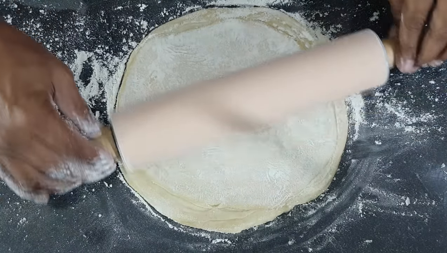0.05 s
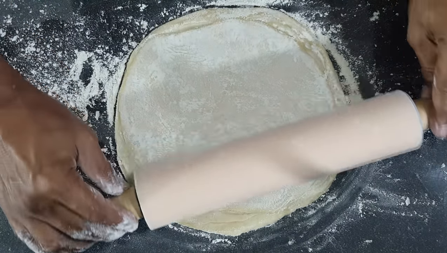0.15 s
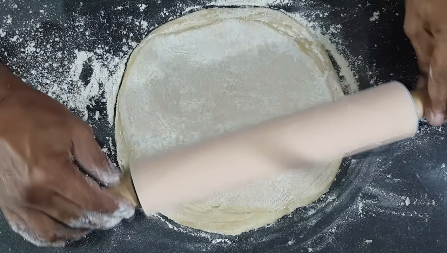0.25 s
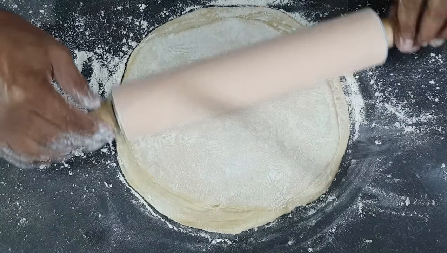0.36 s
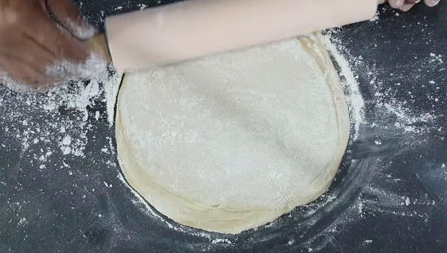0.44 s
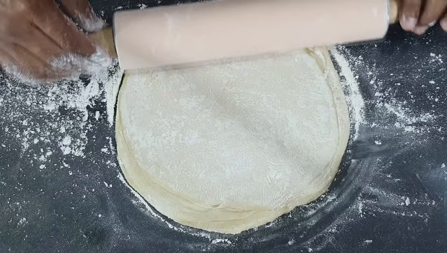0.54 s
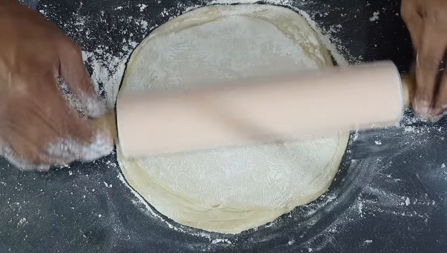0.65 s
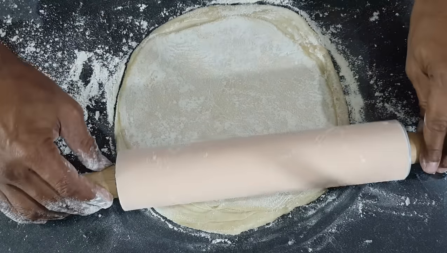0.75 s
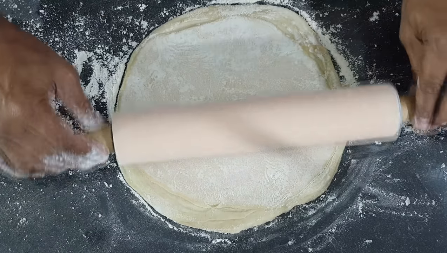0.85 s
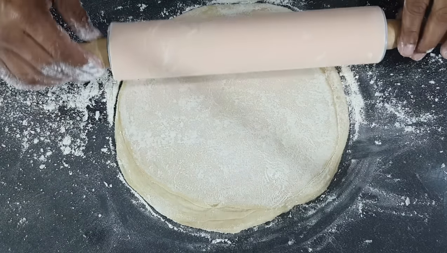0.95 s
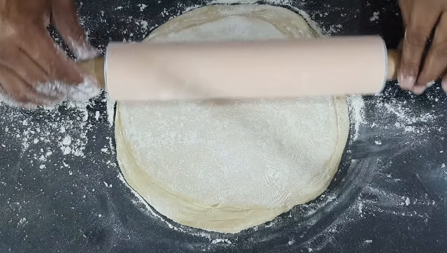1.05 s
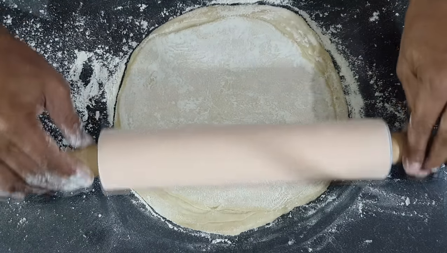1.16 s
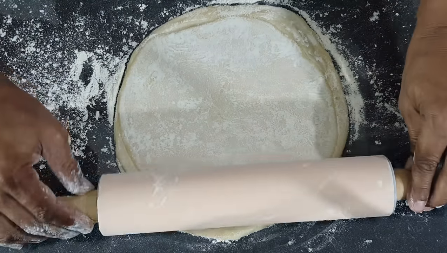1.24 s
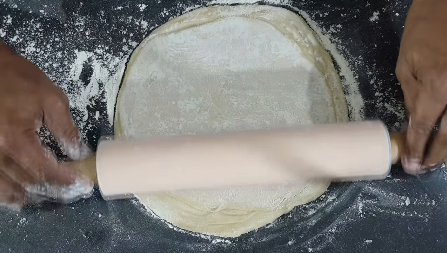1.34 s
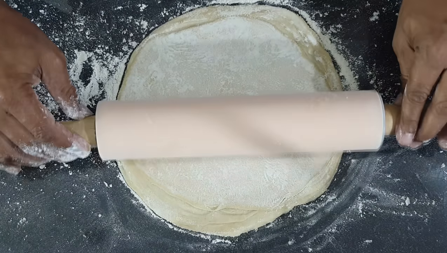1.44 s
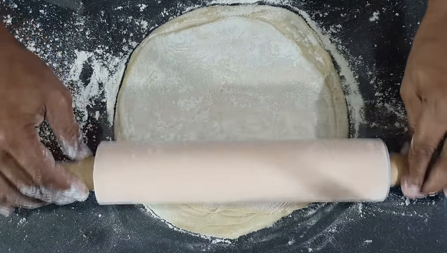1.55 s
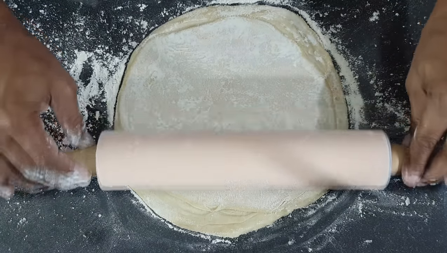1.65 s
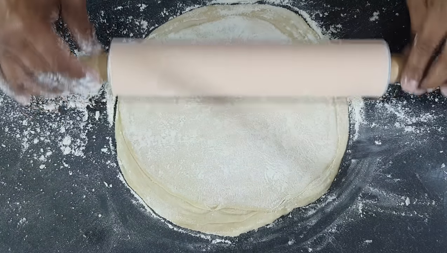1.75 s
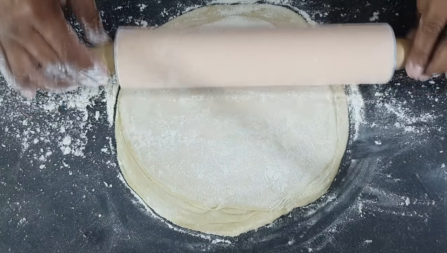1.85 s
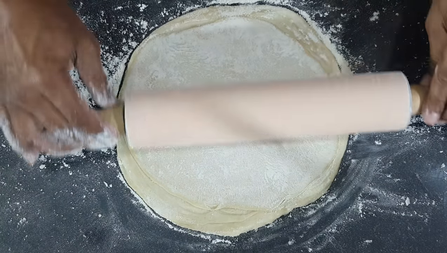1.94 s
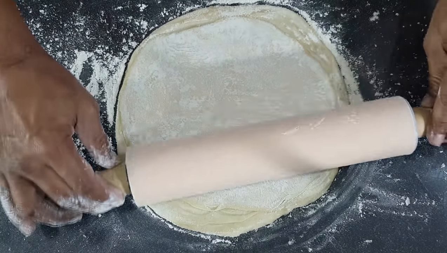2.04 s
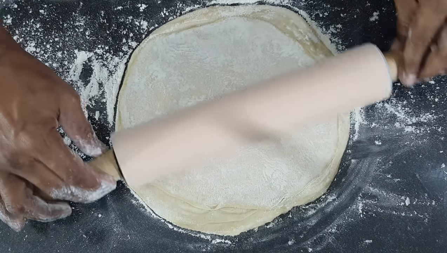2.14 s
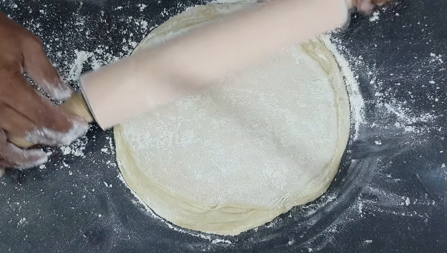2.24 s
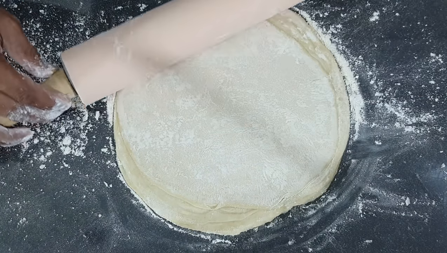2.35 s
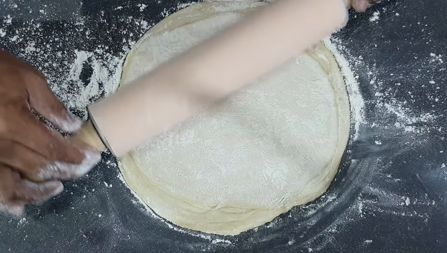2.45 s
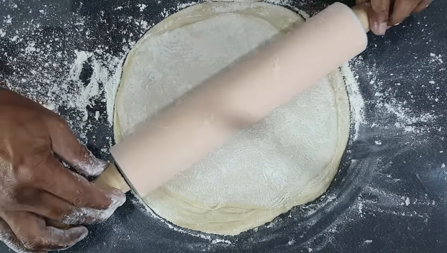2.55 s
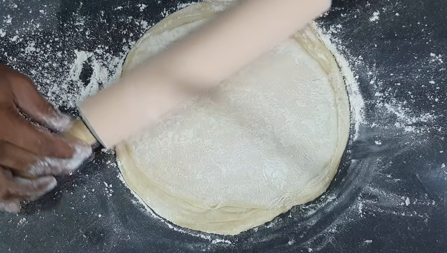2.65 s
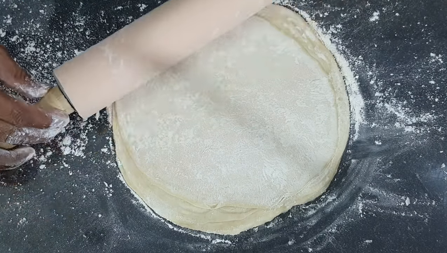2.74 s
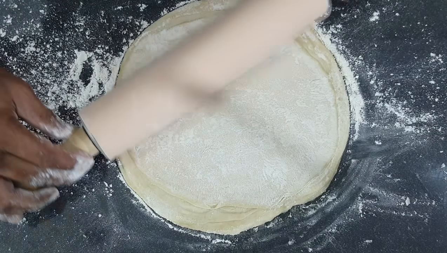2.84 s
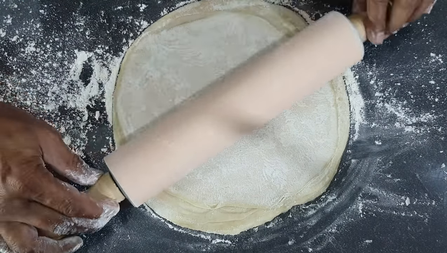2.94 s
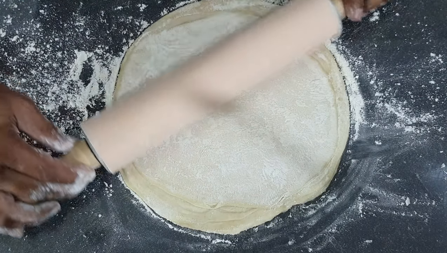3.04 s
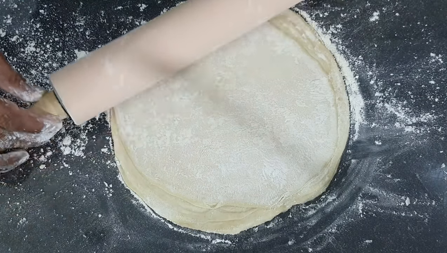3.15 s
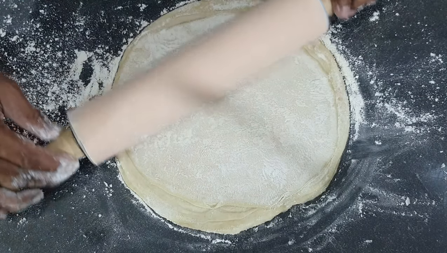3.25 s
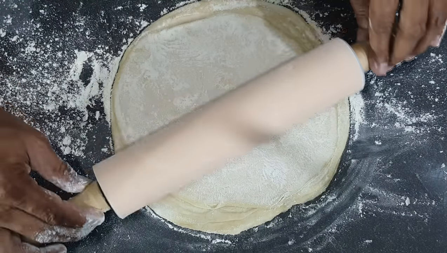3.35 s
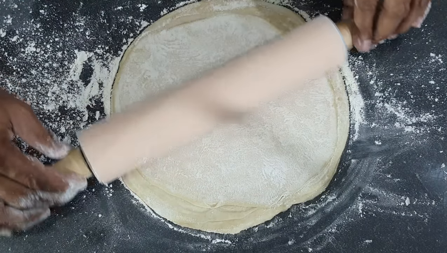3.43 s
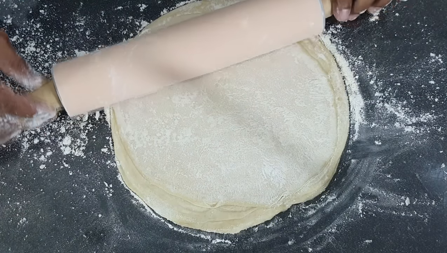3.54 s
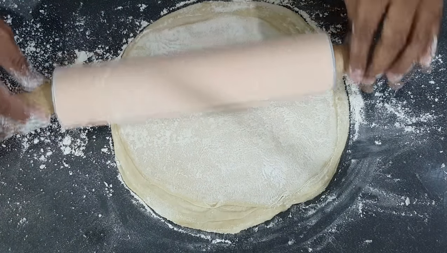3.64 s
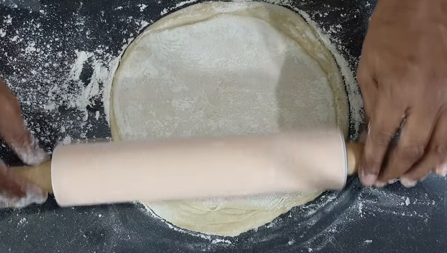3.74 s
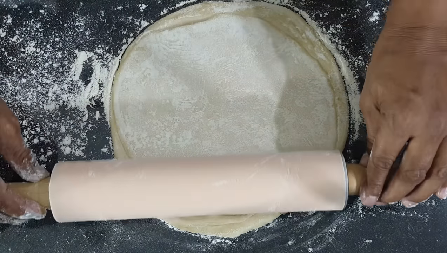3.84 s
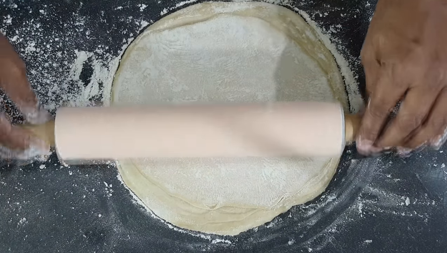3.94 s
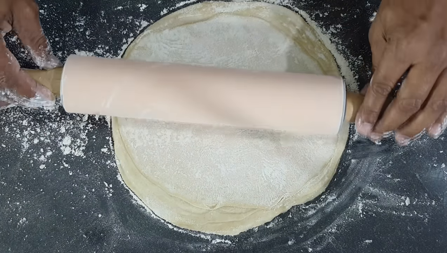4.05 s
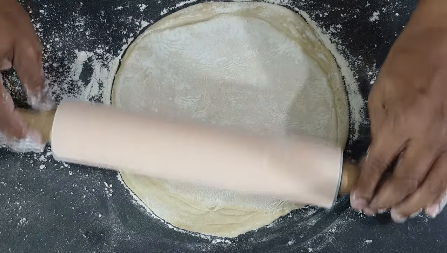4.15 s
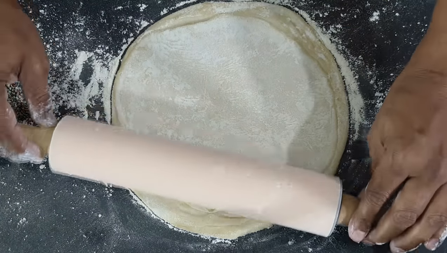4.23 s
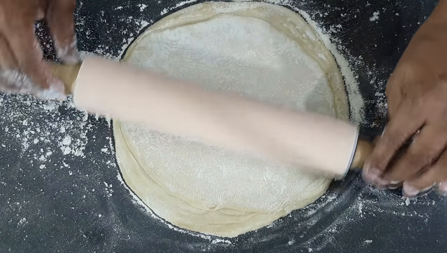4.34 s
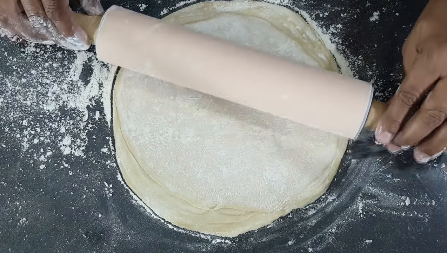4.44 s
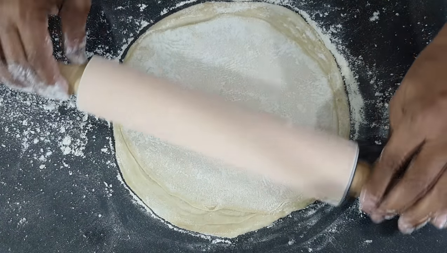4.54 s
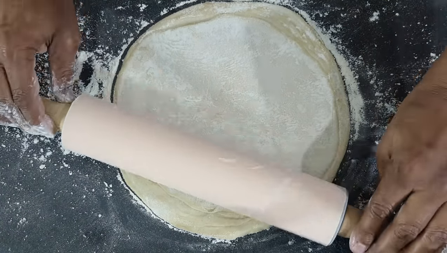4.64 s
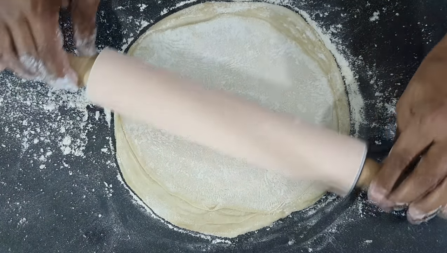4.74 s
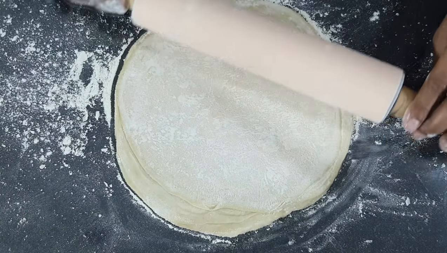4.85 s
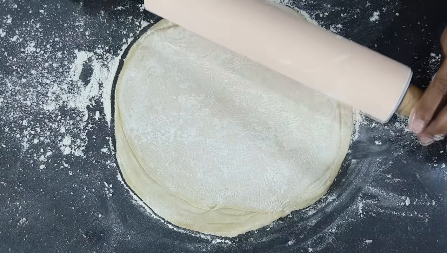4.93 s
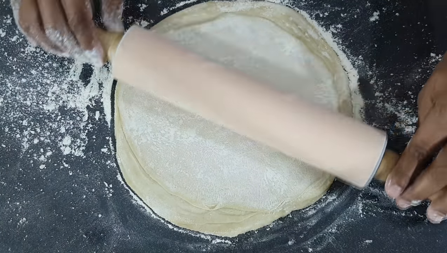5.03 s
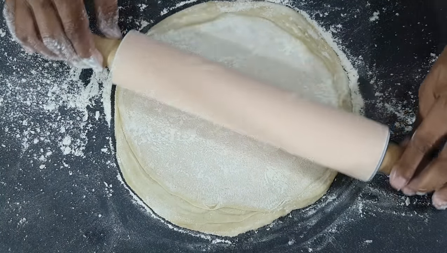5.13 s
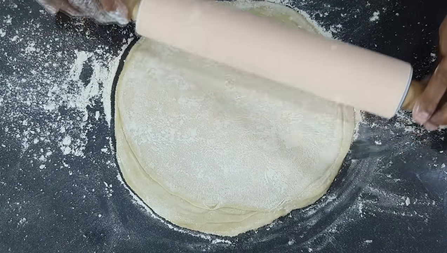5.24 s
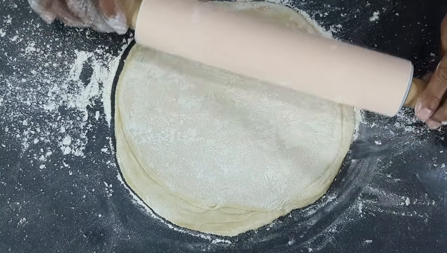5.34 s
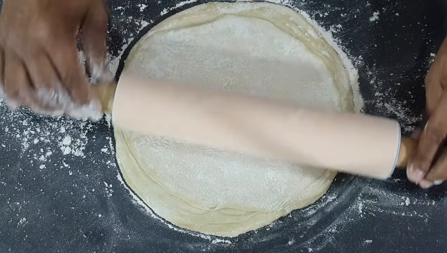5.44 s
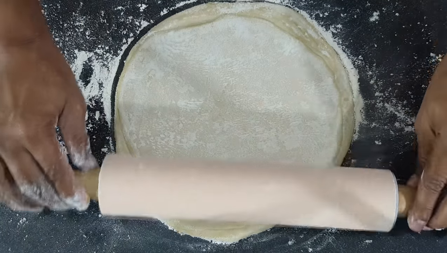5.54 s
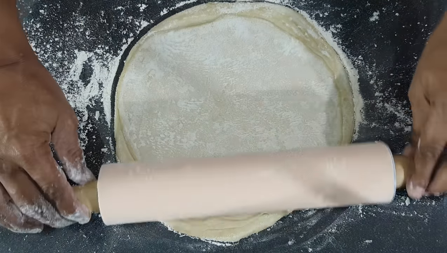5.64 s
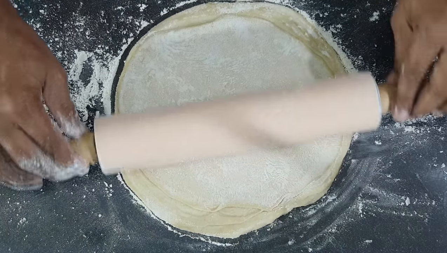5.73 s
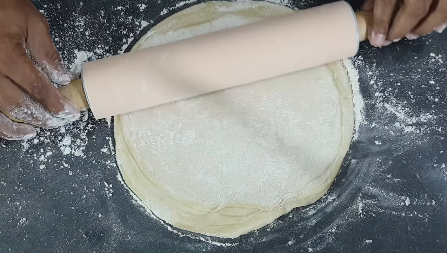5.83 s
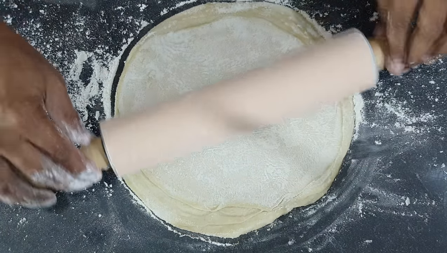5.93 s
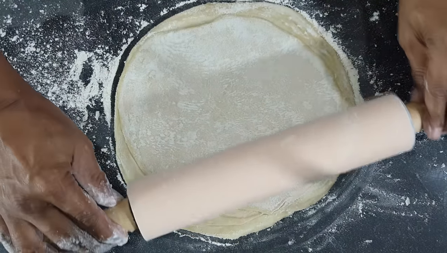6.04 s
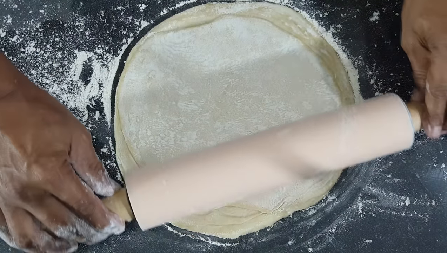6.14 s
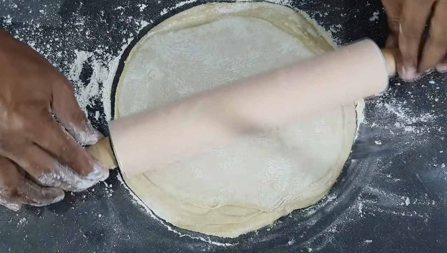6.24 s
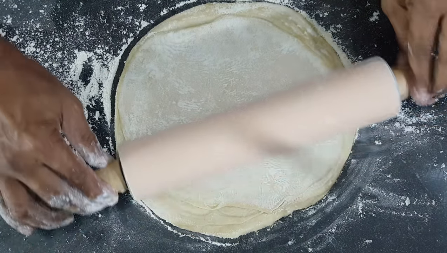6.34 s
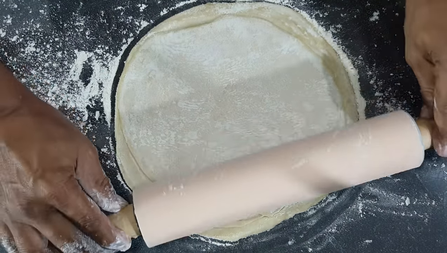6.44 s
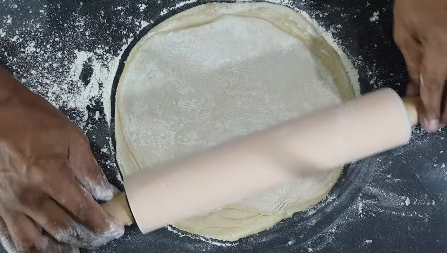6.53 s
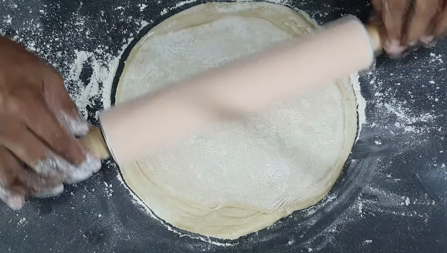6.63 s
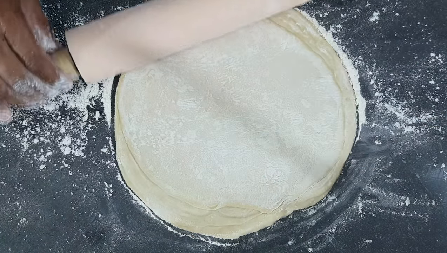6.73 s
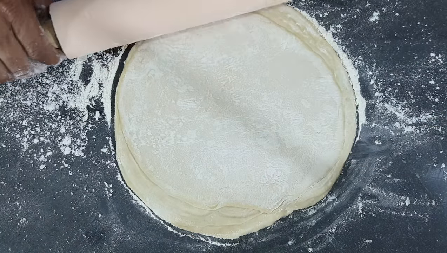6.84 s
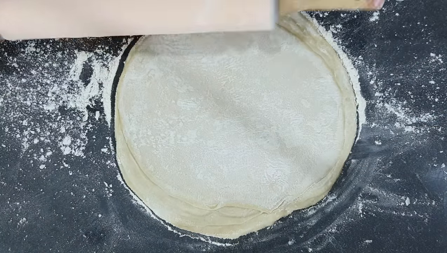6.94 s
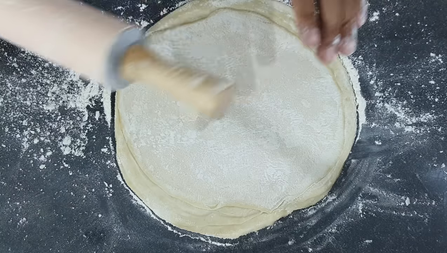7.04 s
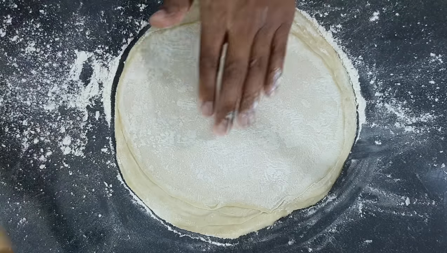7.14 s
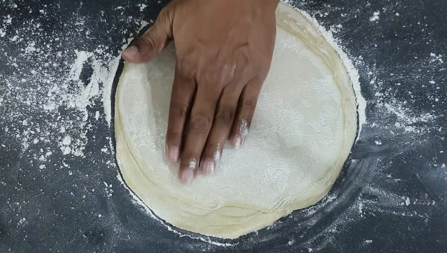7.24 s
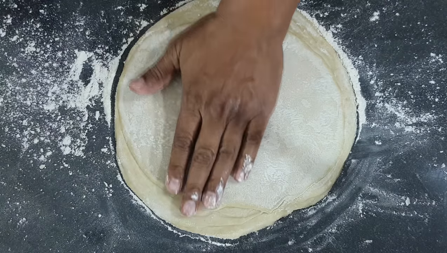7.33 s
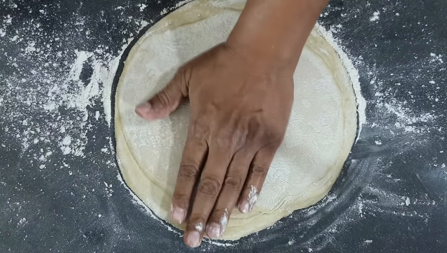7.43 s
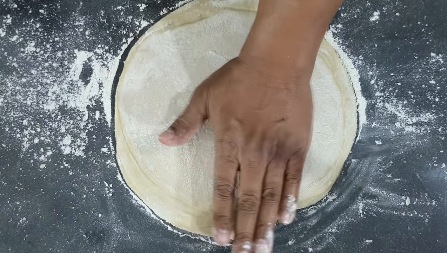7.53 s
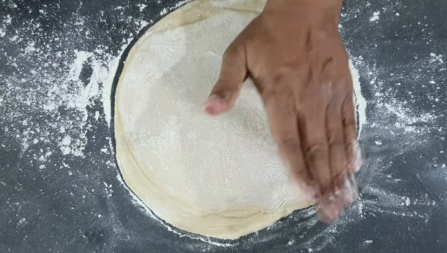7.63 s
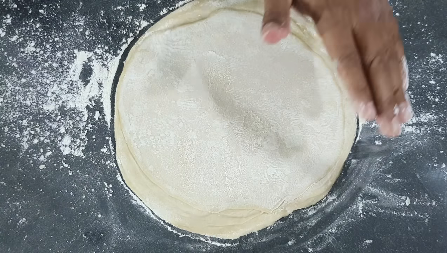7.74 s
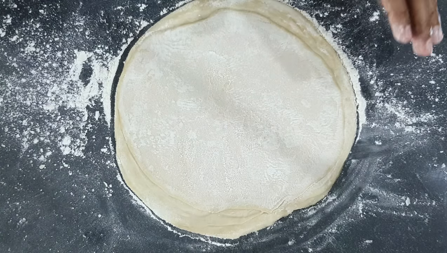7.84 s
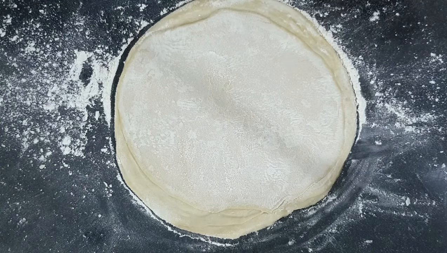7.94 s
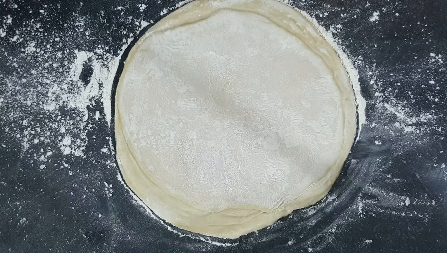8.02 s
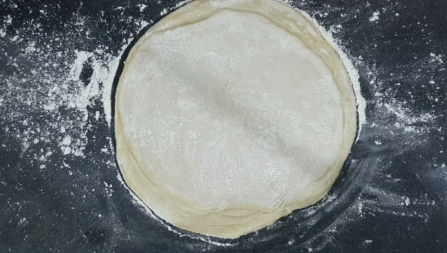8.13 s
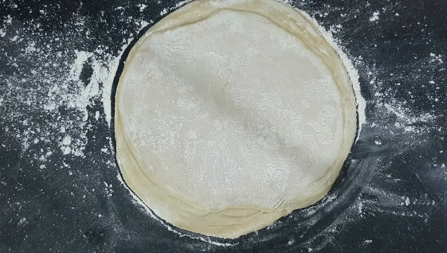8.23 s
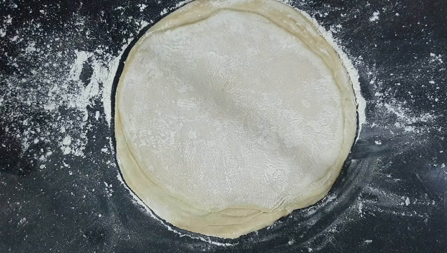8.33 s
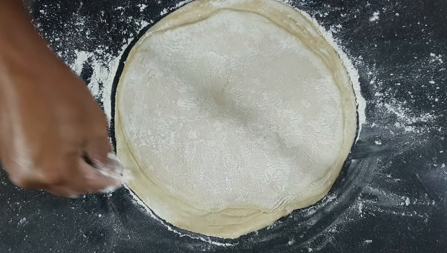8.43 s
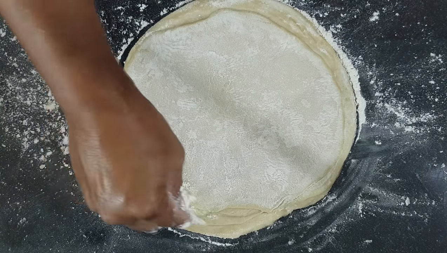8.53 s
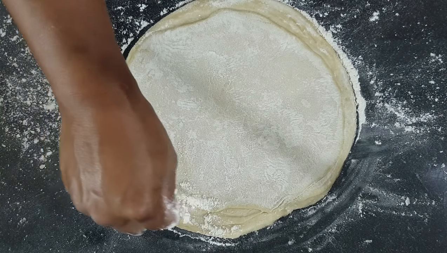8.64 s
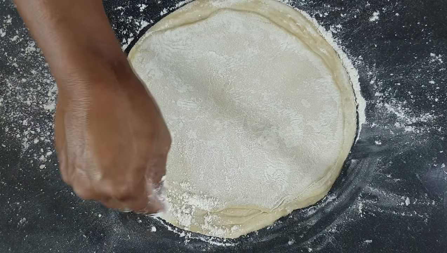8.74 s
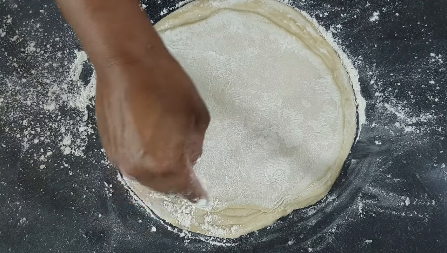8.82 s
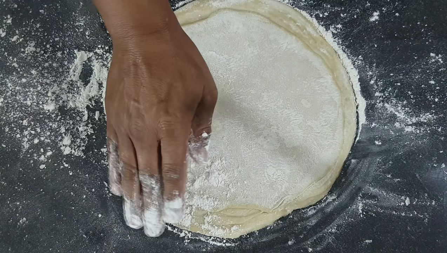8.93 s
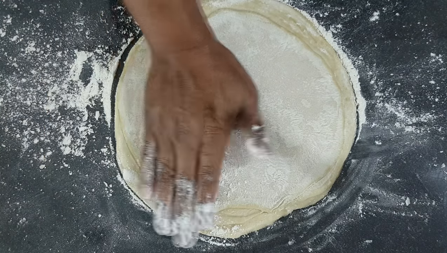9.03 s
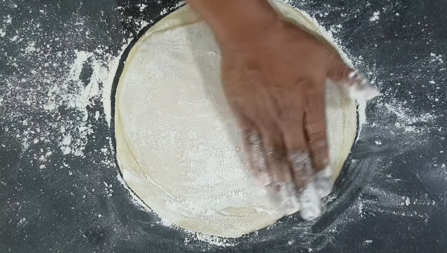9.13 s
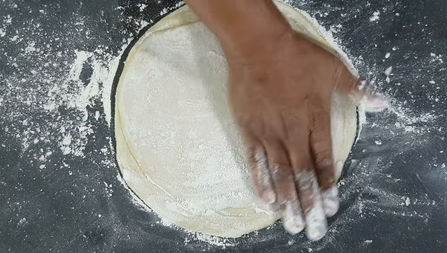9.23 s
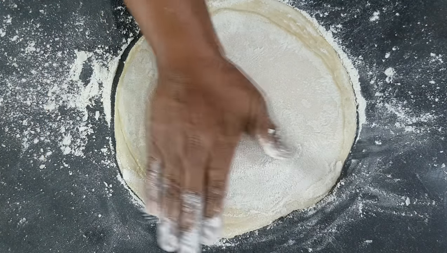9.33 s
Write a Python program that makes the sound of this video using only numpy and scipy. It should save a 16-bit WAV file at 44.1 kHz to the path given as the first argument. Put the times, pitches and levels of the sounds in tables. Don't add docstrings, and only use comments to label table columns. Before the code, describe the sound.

A phone microphone near the slab picks up about four soft rolling strokes per second, dry and grainy, with deep bumps, small hollow knocks and one bright click. The pin is lifted with a knock and short low hum, a hand brushes the dough, then a hard wooden clatter rings through the kitchen and cupboard. After its tail fades, faint sprinkling leads to a brisk rub of floury skin.

```python
import sys
import numpy as np
from scipy import signal
from scipy.fft import rfft, irfft, next_fast_len
from scipy.io import wavfile
from scipy.ndimage import uniform_filter1d

SR = 44100
rng = np.random.default_rng(int(sys.argv[2]) if len(sys.argv) > 2 else 0)


def wav_out(sig):
    wavfile.write(sys.argv[1], SR, np.round(np.clip(np.atleast_2d(sig).T, -1, 1) * 32767).astype(np.int16))


def attenuation_scalar(level_db):
    decades = np.asarray(level_db, float) / 20
    return 10 ** decades


N = 413658

# full speed from [s], held [s], press [dB],
# loose flour over the press [dB], grind over the press [dB].
STROKES = [(0.09, 0.17, -64, -7, -2), (0.31, 0.14, -65.5, -3.5, 0), (0.6, 0.12, -64, -2.5, 6.5),
           (0.859, 0.11, -66.5, 0, -1.5), (1.12, 0.084, -65.5, -4, 5), (1.38, .08, -66, -1, 1.5),
           (1.63, 0.13, -68, 0.5, -3), (1.972, 0.09, -64.5, -3.5, 7.5), (2.17, 0.22, -67, 2.5, -3),
           (2.44, 0.13, -63, -8, 2), (2.761, 0.044, -67, -3.5, 6), (2.91, 0.068, -62.5, -12, -2),
           (3.155, 0.03, -73, 9, 6), (3.33, 0.045, -64, -9, 3.5), (3.53, 0.055, -70, 3.5, 0.5),
           (3.77, 0.094, -62, -6, 0), (3.92, 0.11, -66, -4, -0.5), (4.198, 0.11, -65.5, -6.5, 0),
           (4.38, 0.036, -69, 1.5, -1), (4.53, 0.13, -60.5, -7.5, 0.5), (4.8, 0.078, -71, 6.5, -1.5),
           (5.02, 0.13, -61, -9.5, 4.5), (5.3, 0.031, -68, 6.5, 1), (5.42, 0.14, -68, -4.5, 3),
           (5.7, 0.093, -66, 4, 1), (5.951, 0.15, -62, -9, 1), (6.17, 0.14, -65.5, -0.5, -13),
           (6.46, 0.035, -65, -6, 1), (6.62, 0.071, -68.5, 1, 2), (6.83, 0.19, -61.5, -11, -3)]
# full from [s], held [s], press [dB], loose flour over the press [dB].
HANDS = [(7.03, 0.057, -62.5, 7.5), (7.085, 0.02, -62.5, -5), (7.158, 0.013, -54, -13),
         (7.24, 0.195, -75.5, 3), (7.56, 0.072, -65, 9.5), (7.65, 0.09, -58.5, -3), (8.78, .04, -100, 16),
         (8.88, .04, -95, 16), (9.0, 0.053, -88, 16), (9.07, .07, -80, 15), (9.12, 0.087, -76, -10),
         (9.316, 0.046, -57, -1), (9.365, .03, -50.5, -8)]
HAND_RISE, HAND_FALL = 520, 130
# resonance [Hz], width [Hz], level [dB].
TICK_MODES = [(5180, 870, -6.5), (6990, 2500, -3.5), (8300, 1400, -3), (10440, 2400, -13.5)]
# resonance [Hz], width [Hz], level [dB].
WORKTOP_MODES = [(233, 130, 0.5), (370, 120, 5.5), (470, 120, 6), (640, 100, 2)]


def unit(x):
    return x / np.sqrt(np.mean(x ** 2) + 1e-20)


def along(points, hz):
    f, v = np.transpose(points)
    return np.interp(np.log(hz + 1), np.log(f + 1), v)


def curves(rows, rest):
    rows = np.array(rows, float)
    quiet = [np.r_[s, np.full(rows.shape[1] - 1, -110.)] for s in rest]
    rows = np.vstack([rows, quiet])
    s, *columns = rows[np.argsort(rows[:, 0])].T
    return [np.interp(np.arange(N) / SR, s, c) for c in columns]


def swells(rows, rise, fall, over_db=0.):
    s, held, db = np.transpose(rows)[:3, :, None]
    t = np.arange(0, N + 64, 64) / SR
    lost_db = rise * np.maximum(s - t, 0) + fall * np.maximum(t - s - held, 0)
    level = attenuation_scalar(db + np.reshape(over_db, (-1, 1)) - lost_db)
    gain = np.sqrt(np.sum(level ** 2, axis=0))
    return np.interp(np.arange(N) / SR, t, gain)


def filtered(x, response):
    m = next_fast_len(len(x) + SR // 8)
    return irfft(rfft(x, m) * response(np.fft.rfftfreq(m, 1 / SR)), m)[:len(x)]


def parted(x, hz):
    low = filtered(x, lambda f: 1 / (1 + (f / hz) ** 6))
    return low, x - low


def rush(spectrum, patchy_db, grit_db):
    sizes = rng.exponential(size=N // 32 + 1).repeat(32)[:N]
    grains = rng.standard_normal(N) * attenuation_scalar(grit_db * sizes)
    z = signal.stft(grains, nperseg=512)[2]
    field = uniform_filter1d(rng.standard_normal(z.shape), size=6, axis=0)
    field = uniform_filter1d(field, size=8, axis=1)
    x = signal.istft(z * attenuation_scalar(patchy_db * unit(field)), nperseg=512)[1][:N]
    points = [(1, -120), *spectrum, (SR / 2, -90)]
    return unit(filtered(x, lambda hz: attenuation_scalar(along(points, hz))))


def steadied(x, share):
    swing = np.sqrt(np.abs(uniform_filter1d(x * x, size=SR // 30)) + 1e-3)
    return unit(x / swing ** share)


def struck(modes, contact, scatter_db=1.0):
    u = np.arange(SR // 4) / SR / contact
    blow = u * u * np.exp(-u)
    gains = [attenuation_scalar(db + scatter_db * rng.standard_normal()) for _, _, db in modes]

    def response(f):
        total = 0
        for k, (g, (centre, width, _)) in enumerate(zip(gains, modes)):
            band = 1j * f * width
            total = total + (-1) ** k * g * band / (centre * centre - f * f + band)
        return total

    ring = filtered(blow, response)
    return ring / np.abs(ring).max()


def cracked(ring, share_db, t60):
    t = np.arange(SR // 50) / SR
    spray = attenuation_scalar(share_db - 60 * t / t60) * rng.standard_normal(len(t))
    spray[0] = 1
    ring = signal.fftconvolve(ring, spray)[:len(ring)]
    return ring / np.abs(ring).max()


def echoed(x, gap=.004, swell=.014):
    # pitch [Hz], t60 [s].
    kitchen = [(150, 0.76), (500, 0.66), (1500, 0.65), (3500, 0.61), (7000, 0.57), (12000, 0.42)]
    hz, t, z = signal.stft(rng.standard_normal(3 * SR // 4), SR, nperseg=256)
    decay = attenuation_scalar(-60 * t / along(kitchen, hz)[:, None])
    tail = signal.istft(z * decay, SR, nperseg=256)[1]
    tail = tail * np.clip((np.arange(len(tail)) / SR - gap) / swell, 0, 1)
    return signal.fftconvolve(x, tail / np.linalg.norm(tail))


def add(track, s, sound):
    part = track[round(s * SR):][:len(sound)]
    part += sound[:len(part)]


def add_with_echo(track, s, ring, echo_db):
    add(track, s, ring)
    add(track, s, attenuation_scalar(echo_db) * echoed(ring))


def still_kitchen():
    # pitch [Hz], density [dB per Hz].
    hiss = [(60, -35.5), (100, -1.5), (220, -10.5), (400, -18.5), (840, -23), (2200, -34), (3000, -31.5),
            (4500, -30), (7000, -26), (11200, -24.5), (15500, -28)]
    return attenuation_scalar(-74.5) * rush(hiss, patchy_db=.5, grit_db=0)


def shaken_stand():
    # full from [s], held [s],
    # level [dB], upper part over it [dB].
    shoves = [(0.05, 0.28, -52, -13.5), (0.47, 0.0048, -47, -8), (0.69, 0.12, -54, -6),
              (1.01, 0.022, -43, -11.5), (1.26, 0.047, -55.5, -5), (1.5, 0.003, -42.5, -5),
              (1.8, 0.061, -48, -16), (2.04, .01, -56, 0), (2.28, 0.038, -47.5, -7.5),
              (2.53, 0.03, -53.5, -6.5), (2.78, 0.043, -55, -1.5), (3.01, 0.045, -49, -14.5),
              (3.17, 0.067, -47, -17.5), (3.41, 0.036, -47.5, -13), (3.67, 0.0047, -38.5, -19),
              (3.83, 0.017, -51.5, -7.5), (4.06, 0.073, -52.5, -7.5), (4.33, 0.042, -48, -12.5),
              (4.53, 0.013, -51.5, -8), (4.7, 0.012, -46.5, -10), (4.88, 0.065, -49.5, -7.5),
              (5.14, 0.044, -46.5, -12), (5.36, 0.07, -49.5, -8.5), (5.57, 0.077, -49.5, -17),
              (5.8, 0.046, -56, -7.5), (6.03, 0.18, -52, -10.5), (6.31, 0.048, -46.5, -8),
              (6.57, 0.14, -47, -11.5), (6.78, 0.088, -49, -31), (6.91, 0.026, -42, -12),
              (7.02, 0.035, -38.5, -12.5), (7.1, 0.034, -59, -1), (7.22, 0.031, -40.5, -22.5),
                (7.34, 0.015, -54.5, -14), (7.48, 0.028, -55, -12), (7.58, 0.29, -73, -3.5),
                (8.36, 0.021, -66, -15), (8.55, 0.044, -68, -15.5), (8.68, 0.012, -54.5, -20),
                (8.8, .4, -67, -31), (9.35, 0.009, -63, -18)]
    # pitch [Hz], density [dB per Hz].
    stand = [(18, -42), (30, -6), (45, 3), (62, 5.5), (90, -5), (120, -24.5), (170, -38)]
    upper = [(80, -35), (110, -1), (140, -9.5), (190, -15), (280, -24.5)]
    rows = shoves
    rise, fall = 134, 140
    low_gain = attenuation_scalar(-1.5) * swells(rows, rise, fall)
    upper_gain = swells(rows, rise, fall, np.transpose(rows)[-1])
    low = low_gain * steadied(rush(stand, patchy_db=5.5, grit_db=-2.0), share=0.6)
    return low + upper_gain * steadied(rush(upper, patchy_db=1.5, grit_db=0.5), share=0.39)


def cupboard_hum():
    # full from [s], held [s], rms [dB].
    hum = (7.075, .03, -43)
    tone = np.sqrt(2) * np.sin(2 * np.pi * 135 * np.arange(N) / SR)
    return swells([hum], rise=200, fall=150) * tone


def thuds():
    # start [s], peak [dB], pitch [Hz], length [s].
    rim_hits = [(0.453, -31, 51.5, 0.013), (0.676, -32.5, 70, 0.012), (0.678, -47, 140, .008),
                (0.727, -35, 46.2, 0.019), (0.995, -48, 76, 0.0087), (1.241, -50, 70.4, 0.025),
                (1.465, -29, 58, 0.016), (1.812, -56, 76.4, 0.013), (2.025, -40.5, 74, 0.016),
                (2.257, -28.5, 55.4, 0.011), (2.768, -63, 80, 0.0062), (2.99, -41, 58, 0.021),
                (3.149, -54, 69, 0.021), (3.653, -33, 43, 0.02), (3.751, -43, 70.4, 0.041),
                (4.529, -33.5, 80, 0.011), (4.728, -39, 52.3, 0.012), (4.863, -41, 65, 0.032),
                (5.122, -42, 68, 0.017), (5.343, -35.5, 56.3, 0.03), (5.834, -42.5, 83, 0.017),
                (6.314, -30, 66, 0.012), (6.316, -43, 130, .008), (6.563, -29.5, 64.7, 0.0086),
                (6.565, -47, 125, .008), (6.9, -41, 125, .008), (6.894, -25, 57, 0.012),
                (7.772, -44, 95, 0.0085), (8.673, -42, 52.7, 0.031)]
    out, t = np.zeros(N), np.arange(SR // 4) / SR
    for s, db, hz, length in rim_hits:
        u = t / max(length, .004)
        push = u * u * np.exp(2 - 2 * u)
        add(out, s, attenuation_scalar(db - 3) * push * np.sin(2 * np.pi * hz * t))
    return out


def tube_knocks():
    # start [s], peak [dB], pitch [Hz], overtones [dB], echo [dB].
    tube_hits = [(0.365, -54.5, 409, -14, -3), (1.477, -56, 258, -20, -10), (2.776, -40.5, 527, 6, 1),
                 (2.783, -30.5, 583, -1.5, -12), (3.08, -67, 1400, -20, -3), (3.149, -58.5, 590, -1, -1),
                 (3.166, -53, 602, -12, -12), (3.998, -58, 420, -18, -17), (4.262, -60, 376, -16, -16),
                 (4.502, -65, 430, -14, -16), (5.283, -59.5, 560, -17, -10), (6.247, -53, 444, -2, -9),
                 (6.281, -47, 370, -12, -18), (6.88, -48, 460, -14, -2), (4.834, -58, 396, -9, -21)]
    # resonance [Hz], width [Hz], level [dB].
    tube = [(1070, 144, -3), (1645, 92, 2), (2140, 150, -6.5), (3180, 440, -13)]
    out = np.zeros(N)
    for s, db, hz, over_db, echo_db in tube_hits:
        wall = struck([(0.988 * hz, 85, 0)], 0.00016)[:2000]
        cavity = struck([(0.968 * hz, 95, 0)], 0.00016)[:2000]
        air = np.convolve(wall, cavity)
        air = np.pad(air / np.abs(air).max(), (0, SR // 4 - len(air)))
        ring = attenuation_scalar(db) * (air + attenuation_scalar(over_db) * struck(tube, .00007))
        add_with_echo(out, s, ring, echo_db)
    return out


def axle_clicks():
    # start [s], peak [dB], echo [dB], rebound after [s], rebound [dB].
    axle_hits = [
        (4.64, -19.5, -5.5, 0.00334, -3.5),
        (7.138, -18.5, -6, 0.0017, -12),
    ]
    # low part [dB], tick [dB], near ping [dB], ping pitch [Hz].
    axle_tone = [
        (-35.5, -20.5, -23, 5500),
        (-17.5, -25.5, -3, 6400),
    ]
    # resonance [Hz], width [Hz], level [dB].
    axle = [
        [(656, 54, -3.5), (1035, 21, 14), (1750, 130, 5.5), (2180, 260, -2.5), (3080, 210, 4), (3530, 270, -25)],
        [(1020, 91, 2), (1450, 540, -6), (1920, 230, -0.1), (2720, 250, -9.5), (3370, 510, -11.5)],
    ]
    # resonance [Hz], width [Hz], level [dB].
    axle_far = [
        [(430, 97, -4.5), (730, 75, -8), (990, 62, 3), (1750, 140, 2), (2080, 140, -0.5), (2490, 220, -4),
         (2770, 130, 1), (3220, 80, 7), (3520, 64, 4), (3800, 220, -2), (4630, 500, -15)],
        [(420, 120, -5), (750, 160, -9), (1000, 170, 1), (1445, 220, -2.5), (1820, 150, 2), (2260, 180, -4.5),
         (2630, 340, -3), (3200, 170, 0.5), (3680, 440, -9.5), (4400, 600, -24)],
    ]
    out, t = np.zeros(N), np.arange(SR // 50) / SR
    for hit, tone, modes, far in zip(axle_hits, axle_tone, axle, axle_far):
        s, db, echo_db, after, again_db = hit
        low_db, tick_db, ping_db, hz = tone
        ring = struck(modes, .00003)
        ring = ring + attenuation_scalar(low_db) * struck(WORKTOP_MODES[1:3], 0.00055)
        ring = ring + attenuation_scalar(tick_db) * struck(TICK_MODES, .00002)
        ping = attenuation_scalar(db + ping_db - 60 * t / 0.0076) * np.sin(2 * np.pi * hz * t)
        add(out, s, ping * (1 - np.exp(-t / 0.00063)))
        add(out, s, attenuation_scalar(db) * ring)
        add(out, s + after, attenuation_scalar(db + again_db) * ring)
        add(out, s, attenuation_scalar(db + echo_db) * echoed(struck(far, .000045, scatter_db=2.0), swell=0.0039))
    return out


def handle_knocks():
    # start [s], peak [dB].
    play = [(0.37, -41), (1.371, -56), (1.991, -52), (3.997, -51), (4.505, -48), (4.838, -46), (5.284, -51),
            (6.25, -45), (6.283, -35), (7.153, -46), (7.195, -47)]
    # resonance [Hz], width [Hz], level [dB].
    loose = [(796, 650, 5), (1297, 440, -3.5), (2110, 600, -10.5), (3237, 900, -10)]
    # start [s], peak [dB], echo [dB].
    handle_hit = (7.0045, -24, -11)
    # resonance [Hz], width [Hz], level [dB].
    handle = [(1020, 200, -10), (1380, 260, 0), (2280, 500, -15), (3200, 700, -10)]
    out = np.zeros(N)
    for s, db in play:
        add_with_echo(out, s, attenuation_scalar(db - 3) * struck(loose, .00004, scatter_db=3), -6)
    s, db, echo_db = handle_hit
    ring = cracked(struck(handle, .00006, scatter_db=.8), share_db=-30, t60=.012)
    add_with_echo(out, s, attenuation_scalar(db) * ring, echo_db)
    return out


def cupboard_boom(since_blow, since_landing):
    # pitch [Hz], level [dB], t60 [s].
    low_modes = [(60.6, -23, 0.81), (68, -30.5, .5), (87, -13, 0.52), (96, -21.5, 0.5), (118.6, -8.5, 0.48),
                 (133.9, -3, 0.52), (142.3, -8, 0.45), (163, -16, 0.48), (214.5, -26.5, 0.6),
                 (224.7, -21.5, .4), (234.4, -19.5, 0.78)]
    panels = [(189.5, -24, .6), (261, -24.5, 0.7), (305, -23, 0.54), (369, -20.5, 0.67), (396, -24.5, 0.38),
              (474, -20, 0.71), (508.7, -30, 0.7), (593, -27.5, 0.8), (708, -27, 0.73), (800, -30, 0.55),
              (900, -30.5, .53), (986, -31.5, 0.57), (1340, -30, .45), (1507, -28.5, 0.61)]
    boom = np.zeros(len(since_blow))
    for k, (hz, level, t60) in enumerate(low_modes + panels):
        rise_s = 0.037 if k < len(low_modes) else 0.055
        swell = attenuation_scalar(level - 60 * since_blow / t60) * (1 - np.exp(-since_blow / rise_s))
        boom += (-1) ** k * swell * np.sin(2 * np.pi * hz * since_landing)
    return boom


def dropped_pin():
    # start [s], peak [dB], contact [s].
    bounces = [
        (7.8009, -.5, .00005),
        (7.8130, -5, .00006),
        (7.8391, -8, .00007),
        (7.8505, -1.5, .00004),
    ]
    # worktop [dB], tick [dB], boom [dB], echo [dB].
    bounce_tone = [(-16, -11.5, -12.5, -1.5), (-11, -18.5, -16.5, 3), (-10.5, -26.5, -19.5, 6),
                   (-21, -5, -11, -4)]
    # resonance [Hz], width [Hz], level [dB].
    spots = [
        [(1250, 380, -17.5), (2300, 700, -12.5), (3256, 450, 0), (4400, 690, -10), (5900, 270, -14)],
        [(1530, 140, -10.5), (2320, 450, -15), (3156, 200, 3.5), (4500, 690, -13.5), (5885, 500, -9)],
        [(1398, 300, -17.5), (2300, 550, -14), (3150, 300, 1.5), (3800, 600, -13.5), (5925, 600, -18.5)],
        [(1460, 270, -19.5), (2730, 320, 0.5), (3540, 460, -2), (4900, 700, 0.5), (5600, 500, -4)],
    ]
    # late by [s], t60 [s].
    chatter = [(.0006, .009), (.0004, 0.0065), (.0003, .006), (.0002, .004)]
    # resonance [Hz], width [Hz], level [dB].
    far_clack = [(860, 420, -12), (1440, 150, -8), (2060, 600, -14), (2800, 500, -10.5), (3270, 600, -7),
                 (4000, 660, -10.5), (6100, 3300, -13.5)]
    out, t = np.zeros(N), np.arange(SR) / SR
    landing = min(s for s, _, _ in bounces)
    for bounce, tone, spot, (late, t60) in zip(bounces, bounce_tone, spots, chatter):
        s, db, contact = bounce
        body_db, tick_db, boom_db, echo_db = tone
        clack = cracked(struck(spot, contact, scatter_db=2.5), share_db=-23.5, t60=0.031)
        tick = cracked(struck(TICK_MODES, .000026), share_db=-11, t60=t60)
        body = attenuation_scalar(db + body_db) * struck(WORKTOP_MODES, 0.00007)
        to_walls = attenuation_scalar(db - 1.5) * struck(far_clack, .00003) + attenuation_scalar(5.0) * body
        add(out, s + late, attenuation_scalar(db + tick_db) * tick)
        add(out, s, attenuation_scalar(db) * clack + body)
        add(out, s, attenuation_scalar(echo_db) * echoed(to_walls, gap=0.0017, swell=0.0073))
        add(out, s, attenuation_scalar(db + boom_db) * cupboard_boom(t, t + s - landing))
    return out


def drag_gain():
    # full from [s], held [s], level [dB].
    drags = [(6.256, 0.048, -54), (6.36, 0.11, -60.5), (6.475, 0.016, -53.5), (6.62, 0.03, -57),
             (6.89, .005, -56), (7.025, 0.01, -52.5)]
    return swells(drags, rise=350, fall=160)


def pin_weight(late_s=0, over_db=0):
    s, held, db = np.transpose(STROKES)[:3]
    rows = np.transpose([s + late_s + 0.29 * held, 0.47 * held, db])
    return swells(rows, 108, 123, over_db)


def hand_press():
    return swells(HANDS, HAND_RISE, HAND_FALL)


def flour_gain(share):
    pin = swells(STROKES, 125, 130, share * np.transpose(STROKES)[3])
    return np.hypot(pin, swells(HANDS, HAND_RISE, HAND_FALL, share * np.transpose(HANDS)[-1]))


def dragging_axle():
    # pitch [Hz], density [dB per Hz].
    sleeve = [(800, -14), (1250, -8), (1450, 0.5), (1650, -9), (2300, -16.5)]
    return attenuation_scalar(-3.5) * drag_gain() * rush(sleeve, patchy_db=2.5, grit_db=1.5)


def sliding_skin():
    # full from [s], held [s], level [dB].
    slips = [(0.27, 0.033, -71), (0.68, .04, -71), (2.16, 0.063, -71), (3.81, 0.086, -74),
             (4.3, 0.086, -73), (5.14, .02, -72), (5.32, 0.013, -67.5), (5.69, 0.034, -70),
             (6.1, 0.11, -72.5), (7.03, 0.034, -60), (7.56, 0.23, -69), (9.0, 0.054, -84.5),
             (9.07, .07, -77.5), (9.17, .03, -82.5), (9.31, 0.054, -71.5)]
    # pitch [Hz], density [dB per Hz].
    skin = [(7500, -30.5), (9000, -2), (11000, -2.5), (12500, -9), (15000, -12.5)]
    gain = np.hypot(attenuation_scalar(-9) * flour_gain(0.44), swells(slips, rise=220, fall=170))
    return gain * rush(skin, patchy_db=2.5, grit_db=1.5)


def squeezed_dough():
    # time [s], level [dB], squeak [dB].
    knead = [(0, -64, -0.5), (0.2, -72.5, 5.5), (0.79, -72.5, 2), (0.93, -63.5, 1), (1.05, -67.5, -3),
             (1.2, -69.5, 6), (1.3, -63, 1), (1.45, -67.5, 5.5), (1.6, -70.5, 2.5), (2.63, -78, 1),
             (2.92, -66.5, -4), (3.12, -73, -2.5), (3.65, -71.5, 1), (3.82, -83, -4), (3.95, -68.5, 0),
             (4.2, -70, 0.5), (5.0, -67, 0), (5.6, -70, 0), (5.8, -66, -3), (6.02, -62, 2), (6.16, -74, -3),
             (6.3, -67, 1.5), (6.5, -69, 3), (7.1, -68.5, 3), (7.55, -74.5, 3.5), (7.7, -72.5, 5),
             (7.78, -59.5, -4), (9.14, -80, 5), (9.3, -84, -1)]
    # pitch [Hz], density [dB per Hz].
    dough = [(150, -36.5), (250, 1), (500, 2), (720, -1), (900, -4), (1300, -9.5)]
    knead_db, squeak_db = curves(knead, rest=(7.84, 8.98))
    weight = pin_weight()
    under_pin = attenuation_scalar(-10) * weight
    under_palm = attenuation_scalar(-19) * np.hypot(weight, hand_press())
    under_axle = attenuation_scalar(-5.5) * drag_gain()
    gain = np.sqrt(attenuation_scalar(knead_db) ** 2 + under_pin ** 2 + under_palm ** 2 + under_axle ** 2)
    deep, squeak = parted(rush(dough, patchy_db=2.2, grit_db=0), 450)
    return gain * (deep + attenuation_scalar(np.maximum(squeak_db, -12)) * squeak)


def pressing_surface():
    # pitch [Hz], density [dB per Hz].
    pressed = [(600, -20.5), (1000, 1), (1400, 6), (2200, 6.5), (3300, 6), (4200, -2.5), (6000, -26)]
    palm = [(900, -23), (1600, -3.5), (2600, -3), (3300, 0), (4400, -8.5), (6000, -33)]
    brush = (7.5, 7.84)
    hands = hand_press()
    press = np.hypot(pin_weight(), hands)
    grind = pin_weight(late_s=0.018, over_db=np.transpose(STROKES)[4])
    low, high = parted(rush(pressed, patchy_db=2.5, grit_db=1), 1840)
    rolled = np.hypot(grind, hands) * low + press * high
    brushed = press * rush(palm, patchy_db=.6, grit_db=.5)
    brushing = np.abs(np.arange(N) / SR - np.mean(brush)) < np.ptp(brush) / 2
    return np.where(brushing, brushed, rolled)


def crushed_flour():
    # pitch [Hz], density [dB per Hz].
    grains = [(3500, -18), (4800, -10.5), (5600, -6.5), (6500, -7.5), (7500, -5.5), (8200, -10),
              (8800, -16), (10000, -26.5)]
    return flour_gain(0.6) * rush(grains, patchy_db=2.2, grit_db=0.14)


def scene():
    slab = shaken_stand() + cupboard_hum() + thuds()
    knocks = tube_knocks() + axle_clicks() + handle_knocks()
    rubbing = dragging_axle() + sliding_skin()
    rolling = squeezed_dough() + pressing_surface() + crushed_flour()
    return (still_kitchen() + slab + knocks + dropped_pin() + rubbing + rolling)[None]


def band_limit(x):
    return signal.sosfilt(signal.butter(12, 16240, fs=SR, output="sos"), x)


def record(dry):
    ceiling, top_hz = .97, 15500
    x = dry[0] / (1 + np.abs(dry[0] / ceiling) ** 4) ** (1 / 4)
    x = filtered(x, lambda hz: hz < top_hz)[None]
    return band_limit(x)


dry = scene()
out = record(dry)
wav_out(out)
```